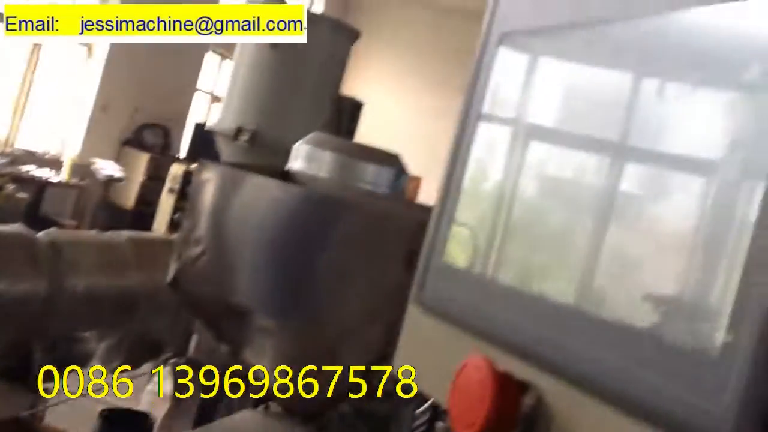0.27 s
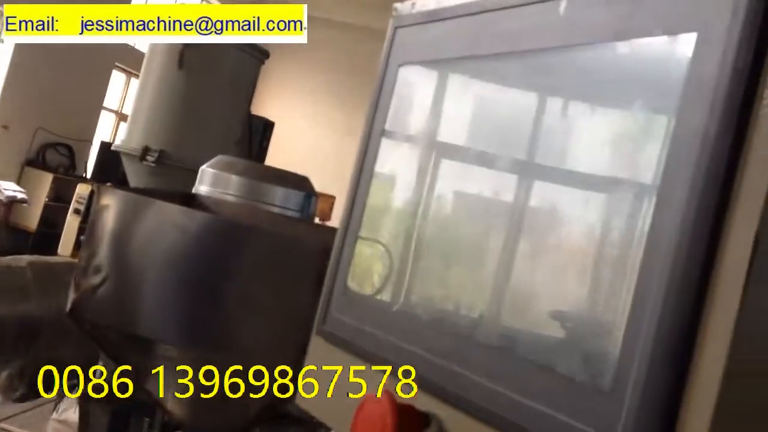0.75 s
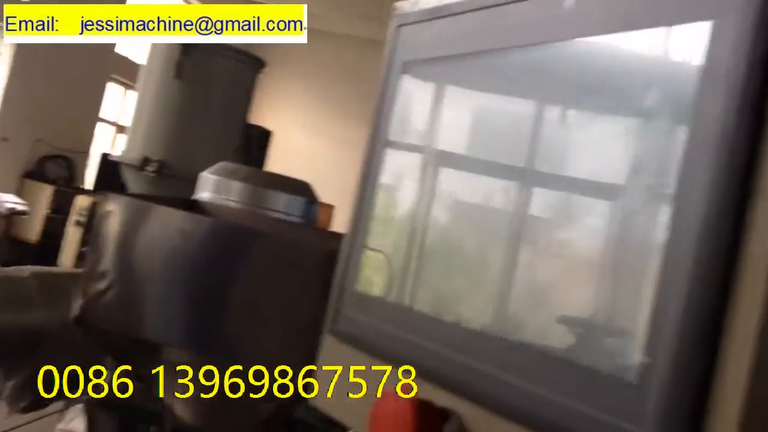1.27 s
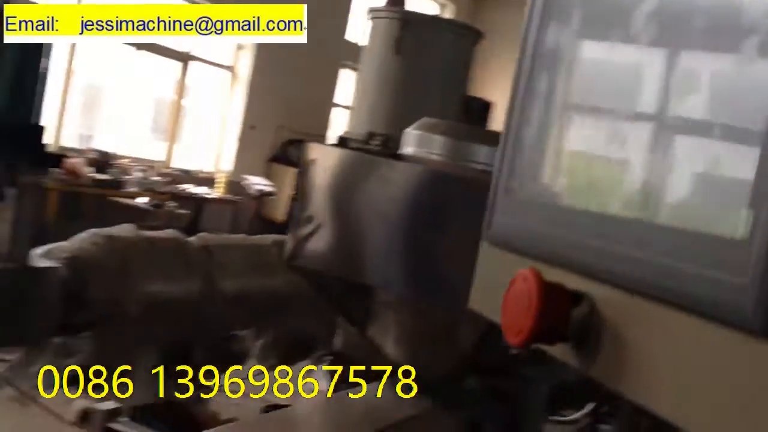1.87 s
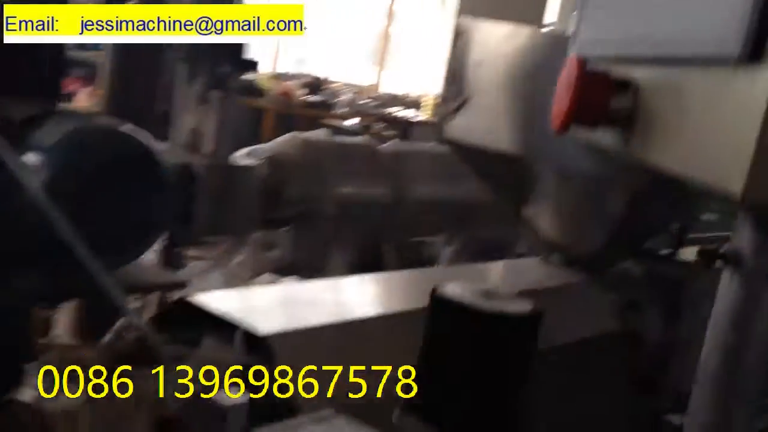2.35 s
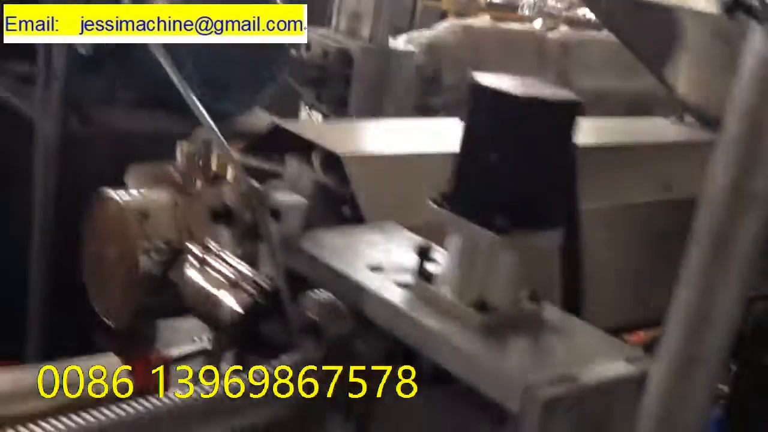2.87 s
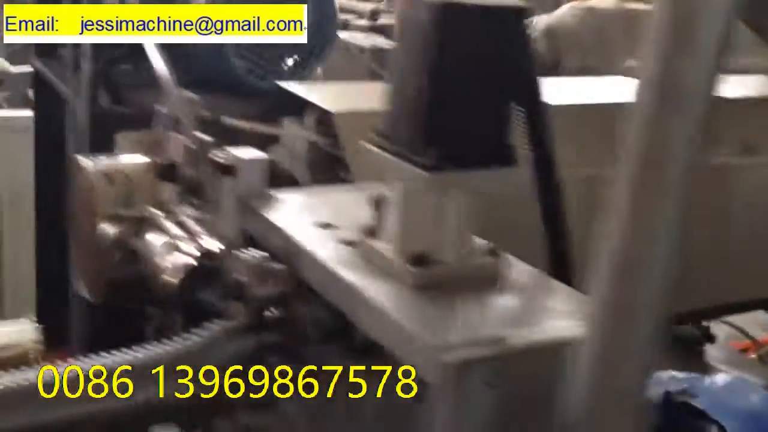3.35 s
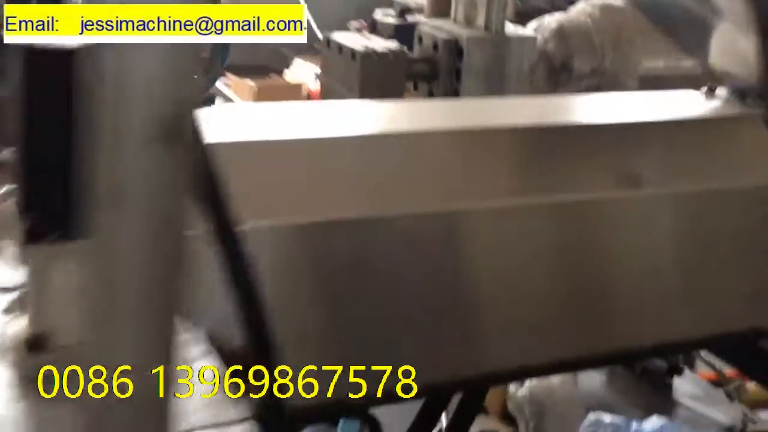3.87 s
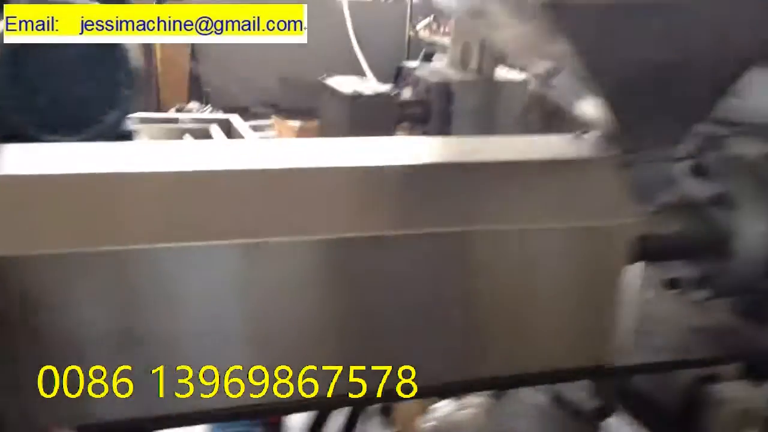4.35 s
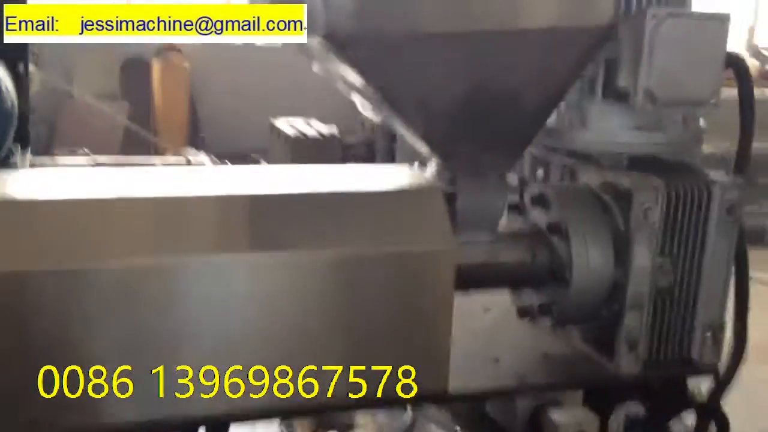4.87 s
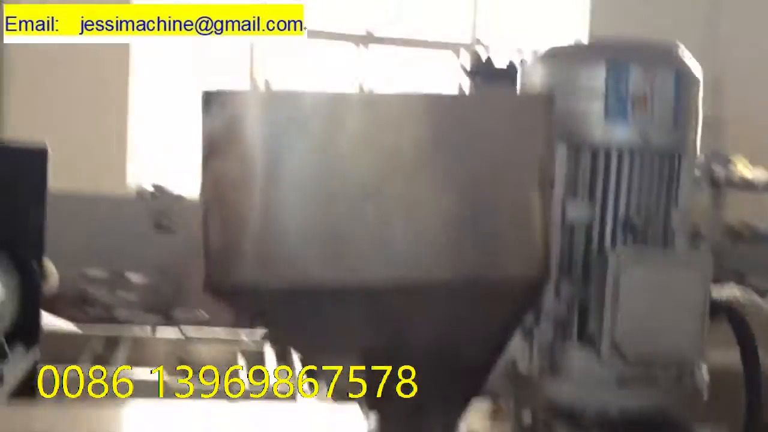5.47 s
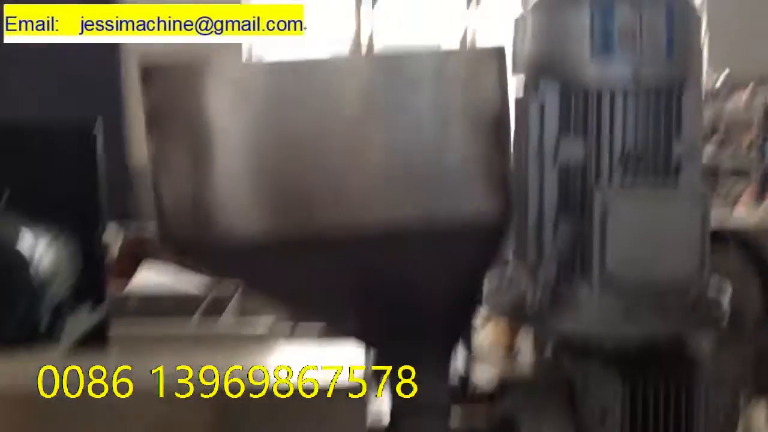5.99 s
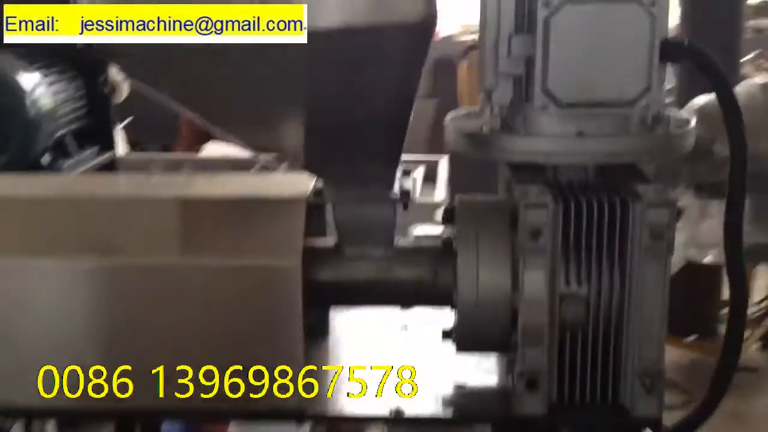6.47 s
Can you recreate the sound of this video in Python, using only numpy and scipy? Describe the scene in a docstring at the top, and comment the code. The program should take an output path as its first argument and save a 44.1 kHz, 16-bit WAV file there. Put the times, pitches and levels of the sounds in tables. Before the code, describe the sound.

From the start, a plastic extrusion line runs loudly and steadily in a factory hall, heard from a phone carried alongside it. Cooling blowers give a low, slightly throbbing drone, while gears and bearings whirr and air hisses evenly on top. Thin, wavering motor whines and a light chatter of loose metal covers sit within the noise. The tone shifts gently as parts pass by: hollow at about 1 second, faintly ringing and metallic from 2 to 4 seconds. From about 4.2 seconds, a fine high sizzle from the hopper and a rougher motor whine join in. A soft, dull handling bump comes at about 4.8 seconds. At 5.6 seconds the sound cuts to silence, then snaps back at 5.9 seconds, with the feed motor and fans close by until the end at about 6.7 seconds.

```python
"""Along a hose extrusion line

A phone is carried through a factory hall, from the control panel past the barrel to the feed hopper.
Cooling blowers roar in their ducts and the drone throbs. Gears and bearings whirr, air hisses,
drives whine and loose covers chatter over the wash of the hall; at the far end the hopper sizzles.
The phone takes a soft fumbling bump, and the sound cuts out for a third of a second."""
import sys
import numpy as np
from scipy import signal
from scipy.fft import rfft, irfft, next_fast_len
from scipy.io import wavfile
from scipy.ndimage import map_coordinates

SR = 44100
rng = np.random.default_rng(int(sys.argv[2]) if len(sys.argv) > 2 else 0)


def master_out(mix):
    """Clip the mix to full scale and print it as 16-bit PCM to the path in sys.argv[1]."""
    frames = np.transpose(np.atleast_2d(mix))
    ceiling = np.clip(frames, -1, 1)
    pcm = np.round(ceiling * 32767).astype(np.int16)
    wavfile.write(sys.argv[1], SR, pcm)


N = 296793
TIME = np.arange(N) / SR
SIZE = next_fast_len(N, real=True)
FREQ = np.maximum(np.fft.rfftfreq(SIZE, 1 / SR), 1)
LEAVE_PANEL, REACH_DRIVE = (2.46, 0.22), (4.24, 0.18)  # crossfades of the walk: t/s, ease/s


def undb(db):
    """Decibels to gain."""
    return np.exp(np.asarray(db) * np.log(10) / 20)

def automation(points):
    """A fader ride: straight lines between (t/s, level/dB) points."""
    return np.interp(TIME, *np.transpose(points))

def colour(points):
    """An EQ curve through (f/Hz, level/dB) points."""
    hz, db = np.transpose(points)
    return undb(np.interp(np.log(FREQ), np.log(hz), db))

def resonances(modes):
    """An EQ curve of resonances, each shaken on its own, so their powers add."""
    f = FREQ[::16]
    power = sum(undb(db) ** 2 / (1 + ((f ** 2 - hz ** 2) / (f * width)) ** 2) for hz, width, db in modes)
    return np.interp(FREQ, f, np.sqrt(power))

def band(low_hz, high_hz, order):
    """A steep band-pass EQ curve."""
    return 1 / np.sqrt(1 + (low_hz / FREQ) ** (2 * order) + (FREQ / high_hz) ** (2 * order))

def turbulence(eq):
    """Noise of rms 1 shaped by an EQ curve."""
    white = rng.standard_normal(len(eq)) + 1j * rng.standard_normal(len(eq))
    noise = irfft(eq * white, SIZE)[:N]
    return noise / noise.std()

def wander(rate, count=2048):
    """A smooth random modulator of spread 1, moving up to about `rate` times a second."""
    hz = np.fft.rfftfreq(count, N / SR / count)
    drift = irfft(rfft(rng.standard_normal(count)) * np.exp(-(hz / rate) ** 2 / 2))
    return np.interp(TIME, np.linspace(0, N / SR, count), drift / drift.std())

def tone(hz, fade, fade_rate, waver_hz=0):
    """A steady or wavering sine plus hall reflections that swell and fade as the phone moves."""
    phase = 2 * np.pi * np.cumsum(hz + waver_hz * wander(fade_rate)) / SR
    whine = (1 + fade * wander(fade_rate)) * np.sin(phase) + fade * wander(fade_rate) * np.cos(phase)
    return whine / whine.std()

def arrival(at_s, ease_s):
    """A smooth fade-in as the phone enters a new place."""
    return .5 + .5 * np.tanh((TIME - at_s) / ease_s / 2)

def along_walk(places):
    """Crossfade a setting through its values at the panel, barrel and feed drive."""
    panel, barrel, drive = places
    return panel + (barrel - panel) * arrival(*LEAVE_PANEL) + (drive - barrel) * arrival(*REACH_DRIVE)

def pass_by(at_s, width_s, db):
    """Gain of a close source, swelling to `db` and fading as the phone goes by."""
    return undb(db) / (1 + ((TIME - at_s) / width_s) ** 2)

def local_ring(modes, low_hz, high_hz):
    """Moving air rings a set of resonances within one band."""
    return turbulence(resonances(modes) * band(low_hz, high_hz, order=4))

def swell(at_s, width_s):
    """A bell-shaped envelope."""
    return np.exp(-((TIME - at_s) / width_s) ** 2)


# duct resonances before transposing: f/Hz, width/Hz, level/dB
DUCT_MODES = [(213, 17, -7), (265, 30, 2), (294, 21, 6)]
# duct transposition at panel, barrel, drive: pitch/semitones
DUCT_PITCH = (-.8, -.3, 0)
# blower fader at panel, barrel, drive: level/dB
BLOWER_FADER = (-29.5, -31.5, -29.5)
def blowers(buffet_db=0.7):
    """Buffeting air booms in the ducts; those further down the line boom higher."""
    boom = turbulence(resonances(DUCT_MODES) * band(197, 440, order=4))
    speed = 2 ** (along_walk(DUCT_PITCH) / 12)
    transposed = map_coordinates(boom, [np.cumsum(speed)], order=3, mode="mirror")
    return transposed * undb(along_walk(BLOWER_FADER) + buffet_db * wander(25))

# room tone spectrum: f/Hz, level/dB
HALL_EQ = [(25, -48), (70, -38), (105, -19.5), (135, -10), (185, -3.5), (300, 2.5), (470, 2.5), (620, -4),
           (1050, -6), (1700, -10.5), (2650, -7.5), (3100, -10), (4800, -12), (5120, -23.5), (9000, -30.5)]
# room tone fader at panel, barrel, drive: level/dB
HALL_FADER = (-30.5, -31.5, -31)
def hall(flutter_db=1.03):
    """The other machines, blurred to a wash by the walls."""
    return turbulence(colour(HALL_EQ)) * undb(along_walk(HALL_FADER) + flutter_db * wander(17))

# gearbox and motor casing resonances: f/Hz, width/Hz, level/dB
CASING_MODES = [(778, 35, 5), (813, 45, 1.5), (905, 37, 3), (994, 29, 2), (1110, 91, -1), (1250, 46, -1),
                (1484, 190, -1.5), (1790, 45, -2.5), (1935, 27, 1), (2022, 33, 3), (2050, 47, 0.5),
                (2220, 60, -5.5), (2320, 72, -1.5), (2465, 55, -8), (2607, 85, -2), (2850, 60, -7),
                (3660, 28, -1.5), (4200, 110, -6.5), (4520, 70, -11.5), (4600, 92, -4.5), (4800, 250, -7.5)]
# whirr fader at panel, barrel, drive, before closeness and trim: level/dB
WHIRR_FADER = (-32, -31.5, -30)
def casings(shake_db=1.2, closeness=1.68, trim_db=-3):
    """Bearings and gears shake the metal casings; closeness widens the swell on approach."""
    db = along_walk(WHIRR_FADER)
    direct_db = db.mean() + closeness * (db - db.mean()) + trim_db
    whirr = turbulence(resonances(CASING_MODES) * band(726, 5100, order=8))
    return whirr * undb(direct_db + shake_db * wander(30))

# bearing and fan blade tones: f/Hz, level/dB relative to the whirr fader
BEARING_TONES = [(979, -18.5), (1696, -20), (2165, -23), (3634, -24.5)]
def bearings():
    """Bearings and fan blades sing faintly, drifting in and out of the whirr."""
    singing = sum(undb(db) * tone(hz, fade=2.5, fade_rate=4.5) for hz, db in BEARING_TONES)
    return singing * undb(along_walk(WHIRR_FADER))

# hiss spectrum: f/Hz, level/dB
AIR_EQ = [(800, -37), (3000, -1.5), (5200, -3.5), (6200, -1), (6900, 1.5), (8000, 0.5), (9600, 0.8),
          (10800, -2.5), (12100, -2), (13500, -3.5), (15200, -7.5)]
# hiss fader at panel, barrel, drive: level/dB
AIR_FADER = (-32.5, -33, -32)
def air(flutter_db=0.45):
    """Cooling air lays an even hiss on top, with a slight flutter."""
    return turbulence(colour(AIR_EQ)) * undb(along_walk(AIR_FADER) + flutter_db * wander(32))

# gear whine ride: t/s, level/dB
MESH_RIDE = [(0, -45), (.45, -50), (1.0, -40.7), (1.7, -44.5), (1.87, -49), (2.12, -40.5), (2.6, -53),
             (2.8, -48), (3.9, -44), (4.6, -47), (5.35, -51), (5.55, -43), (6.12, -36.5), (6.25, -48)]
# ride of its octave: t/s, level/dB
OCTAVE_RIDE = [(0, -49), (3.8, -49.5), (4.05, -45), (4.75, -51), (5.02, -41), (5.25, -44), (5.5, -49),
               (6.0, -44.5), (6.15, -49), (6.42, -41), (6.7, -51)]
# its double octave at panel, barrel, drive: level/dB
TOP_FADER = (-61, -58, -50)
def gears(mesh_hz=2342.6):
    """Meshing teeth give a thin whistle, with fluttering overtones that grow towards the feed drive."""
    whistle = undb(automation(MESH_RIDE)) * tone(mesh_hz, fade=.16, fade_rate=6)
    octave = undb(automation(OCTAVE_RIDE)) * tone(2 * mesh_hz, fade=.5, fade_rate=11)
    top = undb(along_walk(TOP_FADER)) * tone(4 * mesh_hz, fade=.76, fade_rate=9.6)
    return whistle + octave + top

# motor whines: f/Hz, then level/dB at panel, barrel, drive
MOTOR_TONES = [(4390, -63.5, -56, -53), (4400, -58, -52.5, -55), (4470, -65.5, -55.5, -48.5),
               (4590, -53, -57.5, -57), (4730, -59, -59, -49.5), (4768, -66, -58, -57)]
def motors():
    """Motors at slightly different speeds whine in a wavering cluster."""
    return sum(undb(along_walk(fader)) * tone(hz, fade=2.3, fade_rate=8, waver_hz=10)
               for hz, *fader in MOTOR_TONES)

# switching tones: f/Hz, level/dB relative to the ride
INVERTER_TONES = [(7994, -9), (9998, 0), (10004, -5), (11972, -12)]
# inverter whistle ride: t/s, level/dB
INVERTER_RIDE = [(0, -49), (3.3, -55), (3.85, -50), (4.1, -50), (5.25, -56), (5.5, -44.5), (5.95, -51),
                 (6.3, -52), (6.47, -42), (6.7, -58)]
def inverters():
    """Switching currents make the motor windings sing."""
    whistle = sum(undb(db) * tone(hz, fade=0.7, fade_rate=9, waver_hz=4) for hz, db in INVERTER_TONES)
    return whistle * undb(automation(INVERTER_RIDE))

# loose cover modes: f/Hz, relative level/dB
COVER_MODES = [(1794, 1), (1822, -3.5), (1950, -1.5), (2010, -1), (2052, -4.5), (2096, -1), (2166, -3),
               (2490, -2.5), (2560, -4.5), (2625, -3), (2710, 0.5)]
# chatter fader at panel, barrel, drive: level/dB
COVER_FADER = (-46, -42, -39.5)
def loose_covers(ticks_per_s=7, ring_s=0.23, count=150):
    """Covers chatter: light random ticks set each mode ringing briefly."""
    chatter = 0
    for hz, db in COVER_MODES:
        gap, strength, turn = rng.random((count, 3)).T
        starts = (np.cumsum(-np.log(1 - gap)) / ticks_per_s * SR).astype(int)
        ticks = np.zeros(N, complex)
        ticks[starts[starts < N]] = (strength * np.exp(2j * np.pi * turn))[starts < N]
        pole = np.exp((2j * np.pi * hz - np.log(1000) / ring_s) / SR)
        chatter += undb(db) * signal.lfilter([1], [1, -pole], ticks).imag
    return chatter / chatter.std() * undb(along_walk(COVER_FADER))

# panel gap resonances: f/Hz, width/Hz, level/dB
GAP_MODES = [(418, 21, -7.5), (508, 25, 1), (599, 35, -1), (671, 65, -2.5), (1030, 36, -4.5)]
def panel_gap():
    """Air rings hollow in the gap beside the control panel."""
    return local_ring(GAP_MODES, 380, 1107) * pass_by(at_s=1.18, width_s=0.95, db=-33.5)

# throbs of the drone: t/s, f/Hz, level/dB, width/s
DRONE_THROBS = [(0.246, 282, -20, 0.016), (0.965, 261, -19.5, 0.019), (1.388, 288.7, -19, 0.011),
                (1.485, 260.5, -22.5, .012), (1.587, 276, -22, .014), (2.146, 286, -23, .014),
                (2.704, 285, -23.5, 0.023), (3.372, 283, -23.5, .014), (3.797, 316, -17.5, 0.0084),
                (4.207, 291, -20, .018), (4.645, 288.3, -21.5, .018), (4.709, 302, -22, 0.013),
                (5.32, 277.6, -19.5, 0.019), (6.346, 312.4, -21.5, 0.02), (6.578, 293, -21, .014),
                (6.694, 299, -17, 0.012)]
def throbbing(drone, duck=0.33):
    """The drone throbs: short low swells at set times, with the steady drone dipping under each."""
    throbs, dips = 0, 0
    for at_s, hz, db, width_s in DRONE_THROBS:
        envelope = swell(at_s, width_s)
        throbs += undb(db) * envelope * np.sin(2 * np.pi * hz * TIME + rng.uniform(0, 2 * np.pi))
        dips += envelope
    return drone * (1 - np.clip(duck * dips, 0, 1)) + throbs

# die head resonances: f/Hz, width/Hz, level/dB
DIE_MODES = [(1320, 50, -0.5), (1470, 90, -5), (2600, 79, 2)]
def die_head():
    """The die head sings as the phone turns towards it."""
    return local_ring(DIE_MODES, 1150, 2900) * pass_by(at_s=2.34, width_s=.5, db=-42)

# guard resonances: f/Hz, width/Hz, level/dB
GUARD_MODES = [(787, 16, 2.5), (804, 12, 3.5), (843, 12, -6), (930, 18, -4), (953, 16, -6.5),
               (1080, 12, -1), (1140, 12, -1.5), (1816, 46, -2.5)]
# pass-bys of its two ends: t/s, width/s, level/dB
GUARD_ENDS = [(2.95, 0.38, -37), (3.75, .3, -37.5)]
def barrel_guard():
    """The guard over the barrel rings as each end goes by."""
    return sum(local_ring(GUARD_MODES, 700, 2000) * pass_by(*end) for end in GUARD_ENDS)

# fan housing resonances: f/Hz, width/Hz, level/dB
FAN_MODES = [(315.5, 32, -1), (340, 27, -13), (407, 20, -7), (424, 36, -12)]
# fan pass-bys: t/s, width/s, level/dB
FAN_SWELLS = [(3.9, 0.94, -30.5), (4.8, .45, -33.5), (6.55, 0.56, -29)]
def barrel_fans(gust_db=1):
    """Smaller fans drone in their housings, just above the blowers, swelling on each approach."""
    gain = np.sqrt(sum(pass_by(*fan) ** 2 for fan in FAN_SWELLS))
    drone = turbulence(resonances(FAN_MODES) * band(260, 470, order=5))
    return drone * gain * undb(gust_db * wander(11))

# sizzle spectrum: f/Hz, level/dB
SIZZLE_EQ = [(1000, -70), (5500, -17.5), (6900, -1), (8000, 2), (9000, -1.5), (9800, -3.5), (10900, -2.5),
             (11950, -1), (13000, -6.5), (15000, -10.5)]
def hopper_sizzle(db=-34.5, grains_per_s=900, spread_db=1, ring_s=.09):
    """Dense tiny ticks, perhaps sliding pellets, ring the hopper's thin steel in countless modes."""
    hits = rng.random(SIZE) < grains_per_s / SR
    ticks = hits * rng.standard_normal(SIZE) * undb(spread_db * rng.standard_normal(SIZE))
    steel = rng.standard_normal(N) * np.exp(-np.log(1000) * TIME / ring_s)
    sizzle = irfft(rfft(ticks) * rfft(steel, SIZE) * colour(SIZZLE_EQ), SIZE)[:N]
    return sizzle / sizzle.std() * undb(db) * arrival(*REACH_DRIVE)

# feed drive resonances: f/Hz, width/Hz, level/dB
SHRIEK_MODES = [(4160, 130, -1), (4410, 70, 0), (4770, 70, -1.5), (4810, 70, -1.5), (4900, 128, -1)]
def drive_shriek(db=-43, flutter_db=2.5):
    """The feed drive's bearings put a rough, fluttering edge around the motor whines."""
    shriek = turbulence(resonances(SHRIEK_MODES) * band(4000, 5050, order=16))
    return shriek * undb(db + flutter_db * wander(22)) * arrival(*REACH_DRIVE)

# gearbox housing resonances: f/Hz, width/Hz, level/dB
GEARBOX_MODES = [(773, 15, 1.5), (835, 13, 0.5), (920, 16, -1), (988, 17, 0.5), (1090, 14, -5.5),
                 (1138, 12, 1.5), (1420, 40, -7.5), (1835, 45, 1)]
def gearbox():
    """The gearbox housing rings as the phone goes by."""
    return local_ring(GEARBOX_MODES, 700, 2000) * pass_by(at_s=4.85, width_s=.5, db=-38.5)

# knocks on the phone: t/s, f/Hz, level/dB, width/s
HAND_KNOCKS = [(4.754, 164, -18.5, 0.0076), (4.76, 69.5, -53.5, 0.034), (4.767, 308, -20, .009),
               (4.772, 150, -35, 0.014), (4.808, 145, -31, 0.011)]
def fumble(rub_db=-35):
    """Soft knocks of the hand, a few low cycles each, wrapped in the dull rub of fingers."""
    knocks = sum(undb(db) * swell(at_s, width_s) * np.cos(2 * np.pi * hz * (TIME - at_s))
                 for at_s, hz, db, width_s in HAND_KNOCKS)
    rub = turbulence(band(115, 220, order=4)) * swell(at_s=4.775, width_s=0.032)
    return knocks + undb(rub_db) * rub

# motor cowl resonances: f/Hz, width/Hz, level/dB
COWL_MODES = [(785, 13, 3), (890, 12, 5.5), (1052, 14, 2), (1110, 14, 6), (1148, 14, 5.5), (1186, 16, 4),
              (1270, 26, 5.5), (1698, 18, 5), (1920, 20, 2), (11600, 2500, -7.5)]
def feed_motor():
    """The feed motor's cowl rings under its bright fan hiss."""
    return local_ring(COWL_MODES, 800, 13000) * pass_by(at_s=6.3, width_s=0.94, db=-34)

# hopper resonances: f/Hz, width/Hz, level/dB
HOPPER_MODES = [(533, 40, -1.5), (617, 45, -5), (720, 50, -7), (876, 54, -1), (1035, 54, -8)]
def hopper_ring():
    """The steel hopper rings along with the motor."""
    return local_ring(HOPPER_MODES, 482, 1150) * pass_by(at_s=6.4, width_s=1, db=-38.5)


def scene():
    """The mix at one microphone, the same left and right."""
    bed = throbbing(blowers() + barrel_fans()) + hall() + casings() + air() + loose_covers()
    whines = bearings() + gears() + motors() + inverters()
    pass_bys = panel_gap() + die_head() + barrel_guard() + gearbox()
    feed_end = hopper_sizzle() + drive_shriek() + feed_motor() + hopper_ring()
    mono = bed + whines + pass_bys + feed_end + fumble()
    return np.array([mono, mono])

def record(dry, cut_s=5.610, back_s=5.928, drop_db=-13, die_s=0.065, top_hz=15300):
    """The sound drops, dies fast and snaps back; a steep low-pass takes off the top throughout."""
    dying = undb(drop_db - 60 * np.clip((TIME - cut_s) / die_s, 0, 2))
    gate = np.where((TIME > cut_s) & (TIME < back_s), dying, 1)
    low_pass = signal.ellip(12, .1, 90, top_hz, fs=SR, output="sos")
    return signal.sosfilt(low_pass, dry * gate)


dry = scene()
out = record(dry)
master_out(out)
```